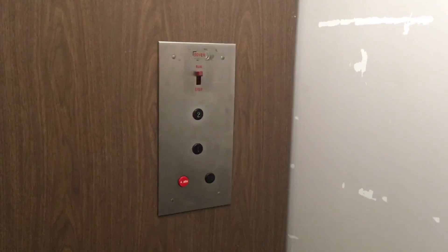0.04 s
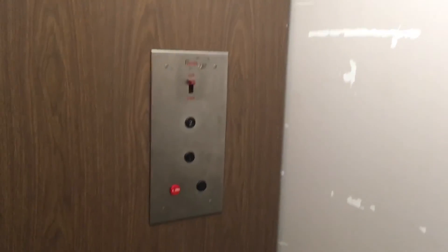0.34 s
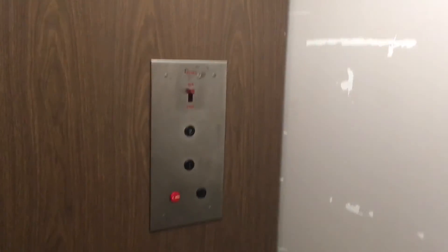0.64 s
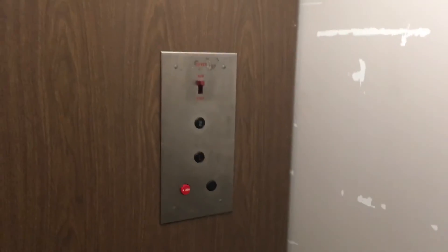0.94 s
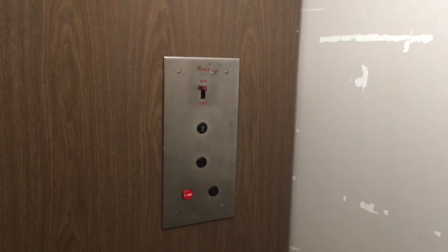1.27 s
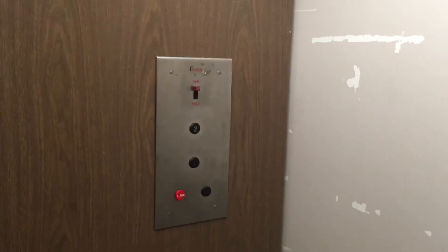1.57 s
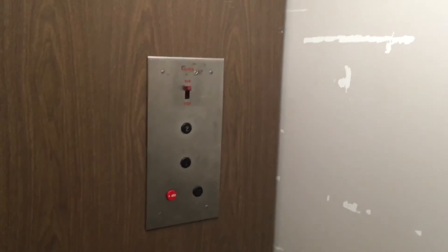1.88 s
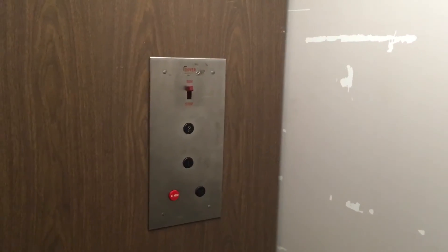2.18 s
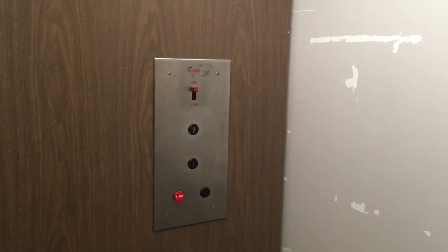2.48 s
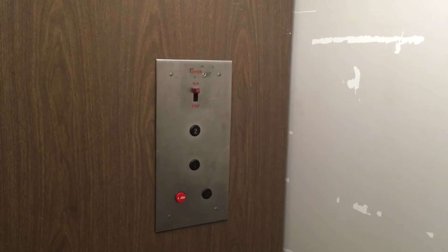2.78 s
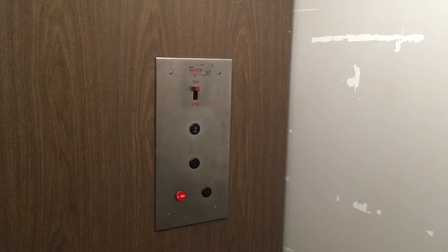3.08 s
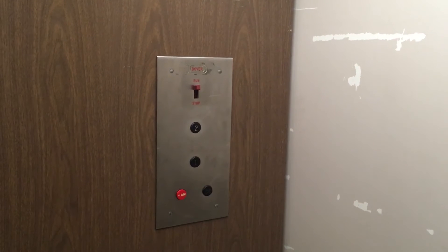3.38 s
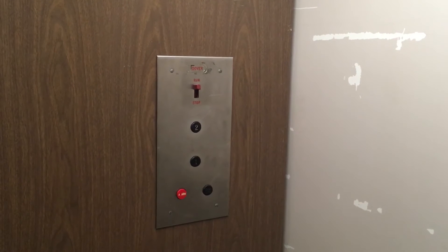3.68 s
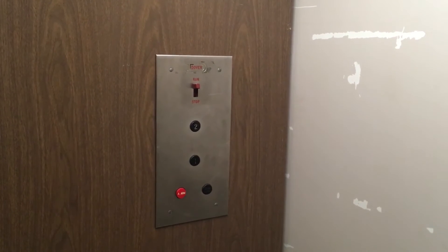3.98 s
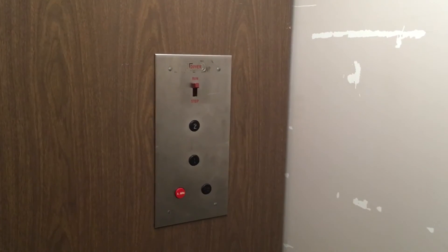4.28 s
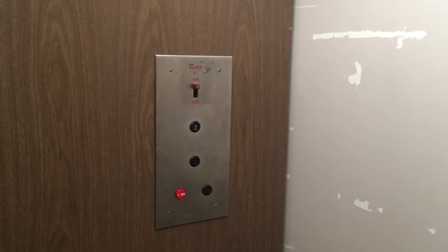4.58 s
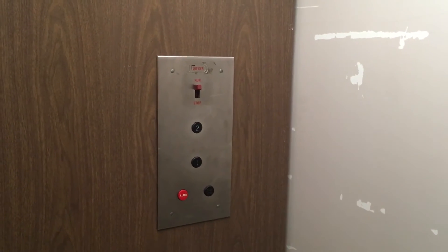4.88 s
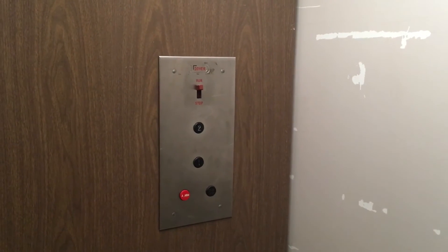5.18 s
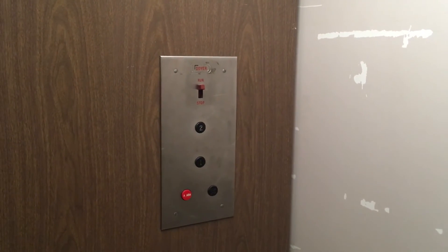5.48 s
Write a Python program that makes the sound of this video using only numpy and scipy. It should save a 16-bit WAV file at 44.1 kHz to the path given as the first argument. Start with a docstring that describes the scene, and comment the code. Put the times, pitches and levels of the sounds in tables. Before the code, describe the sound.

An elevator door rattles and thuds shut, then a soft clunk and a click come over a low machinery hum.

```python
"""Inside an old panelled elevator car. The door rolls along its track, its blows ringing panels and
metalwork; the latch clicks and the door slams shut. The car booms in its low modes and settles with
a knock and a small squeak of metal slipping on metal. Then the linkage clunks softly and a relay
clicks sharply over the machinery's throbbing drone, motor tones, mains hum and the shaft's rumble."""
import sys
import numpy as np
from scipy import signal
from scipy.fft import rfft, irfft
from scipy.io import wavfile
from scipy.ndimage import uniform_filter1d

SR = 44100
rng = np.random.default_rng(int(sys.argv[2]) if len(sys.argv) > 2 else 0)


def persist_wave(psi):
    """Save psi, clipped to +-1, as 16-bit WAV."""
    counts = np.round(np.clip(psi, -1, 1) * 32767).astype(np.int16)
    wavfile.write(sys.argv[1], SR, np.atleast_2d(counts).T)


N = 248724
T = np.arange(N) / SR
HZ = np.fft.rfftfreq(N, 1 / SR)

# Door blows. Each row: start in seconds, panel level in dB, metal level in dB, contact in seconds.
DOOR_BLOWS = [ (0.000, -25, -27.5, 0.003), (0.032, -29, -25.5, 0.0067), (0.085, -56, -34, 0.0074),
              (0.171, -34.5, -39, 0.0034), (0.194, -47, -39, .001), (0.258, -59, -35, 0.018),
              (0.309, -53, -33, 0.0047), (0.335, -35.5, -24.5, 0.0018), (0.355, -25.5, -31.5, 0.0081),
              (0.415, -30.5, -56, 0.017), (0.626, -42, -70.5, .009), (0.676, -51, -53, 0.0032),
              (0.696, -45, -50, 0.0047), (1.170, -57.5, -76, 0.018), (1.313, -68, -71.5, 0.0017), ]
# Knocks on single parts. Each row: start in seconds, part, level in dB, contact in seconds.
PART_KNOCKS = [ (0.000, "track", -24.5, .007), (0.164, "track", -30, 0.011), (0.194, "latch", -23.5, .001),
               (0.335, "latch", -26.5, 0.0014), (0.335, "frame", -25.5, 0.0026),
               (0.340, "floor", -24, 0.015), (0.357, "frame", -23.5, .005), (0.372, "track", -35, 0.01),
               (0.680, "catch", -39, 0.014), (0.919, "catch", -42, 0.0078), (1.900, "lever", -43.5, .003),
               (1.901, "rod", -56.5, 0.0036), (1.912, "rod", -53, .009), (1.915, "floor", -44, .01),
               (1.936, "lever", -42.5, 0.0022), (1.939, "rod", -59, .011), (1.948, "floor", -36, 0.024),
               (4.206, "relay", -48.5, 0.0004), (4.268, "lever", -64, .003), ]
# Resonances by part. Each row: frequency in Hz, width in Hz, peak in dB.
PART_RESONANCES = dict( panel=[(798, 22, 12), (878, 16.7, 12), (1560, 27, 10.5)], metal=[(2280, 130, -1),
                   (4110, 66, 2.5), (5600, 50, 4), (6360, 33, 8.5), (7860, 28, -9), (8580, 53, 9.5)],
                   latch=[(3640, 87, 6), (7130, 80, 3), (9490, 246, 6), (9500, 99, 2), (11520, 60, 5),
                   (13500, 120, 2.5)], frame=[(2537, 22, -1), (2830, 13, 10), (2845, 20, -2), (3030, 90, 7),
                   (3213, 18, 14.5)], track=[(163, 29, 7.5)], catch=[(954, 22, 15), (1185, 210, 9),
                   (2277, 105, 13), (6520, 260, 16)], lever=[(877, 40, 8.5), (1117, 96, 5.5),
                   (1150, 50, 2)], rod=[(4420, 260, 11), (5480, 180, 4)], floor=[(219, 16, 11.5),
                   (394, 20, 11.5)], relay=[(2700, 150, 13), (4530, 400, -3), (7500, 300, -1)])
# Broad spectra by part. Each row: frequency in Hz, relative density in dB.
PART_SPECTRA = dict( panel=[(60, -18), (150, 4.5), (300, -4), (500, -6.5), (720, -11), (880, -12),
                (1150, -5), (1600, -11), (2300, -18.5), (4000, -20.5), (16000, -45.5)], metal=[(300, -32),
                (900, -15), (1600, 0.5), (2300, -4), (3100, -10.5), (3800, -10), (5000, -13.5),
                (6400, -11.5), (8500, -11.5), (11000, -28.5), (16000, -26)], latch=[(1000, -35),
                (3500, -6.5), (4900, -19.5), (6800, -3.5), (8100, -9), (9600, -3), (10500, -8), (11700, -1),
                (15000, -7), (16000, -4)], frame=[(1000, -37), (2300, -20.5), (2800, -6), (3150, -11.5),
                (3400, -12), (3800, -23), (8000, -24.5), (16000, -46)], track=[(70, -10), (118, 2),
                (160, 3), (190, -7.5), (240, -42), (1000, -49)], catch=[(200, -30), (500, 6.5), (700, -8),
                (1150, -3.5), (1600, -19), (2300, -12.5), (4500, -20.5), (6600, -21.5), (9500, -18),
                (16000, -52)], lever=[(200, 1.5), (550, -23), (740, -15.5), (1100, -2), (1400, -8),
                (2100, -21), (5000, -27), (16000, -44)], rod=[(1200, -14), (3000, 0), (3900, -2),
                (4400, -2.5), (5800, 0.5), (7000, -11), (9500, -12), (16000, -37)], floor=[(80, -26),
                (160, -1.5), (220, -1.5), (380, -7.5), (430, -28), (550, -6.5), (750, -21.5), (2000, -36),
                (16000, -75)], relay=[(200, -10), (500, 0), (1700, -1), (2600, -9), (3500, -9), (6400, 0),
                (8500, -1.5), (10500, -13), (16000, -3.5)])
# Decay on top of the cabin's. Each entry: part, rate in dB per second.
PART_DAMPING_DB_PER_S = dict(frame=66, lever=24, catch=10, floor=22)
# Cabin ring time. Each row: frequency in Hz, T60 in seconds.
CABIN_T60_S = [(100, 0.518), (250, 0.84), (500, 0.73), (1000, 0.53), (2200, 0.4), (4000, 0.38), (8000, .3),
               (16000, 0.18)]
# Car shaken by the rolling door. Each row: frequency in Hz, relative density in dB.
RUMBLE_SPECTRUM = [(12, -9), (25, -8.5), (36, 4.5), (47, 10), (63, -11), (84, 10.5), (100, -11.5),
                   (135, -9), (200, -18.5), (400, -72)]
# Rollers on the track. Each row: frequency in Hz, relative density in dB.
ROLLER_SPECTRUM = [(80, -9), (160, 8.5), (200, -0.5), (233, 6.5), (275, -1), (520, 0), (750, -6.5),
                   (1300, -16.5), (1800, -21.5), (2350, -18.5), (3000, -28), (16000, -38)]
# Shaft noise. Each row: frequency in Hz, relative density in dB.
SHAFT_SPECTRUM = [(12, -41.5), (32, 2), (55, 4.5), (90, 1.5), (135, -9.5), (230, -19.5), (400, -21),
                  (800, -31), (1150, -28.5), (1900, -32), (3300, -32), (4900, -39.5), (6000, -36.5),
                  (8000, -42), (13500, -39.5)]
# Motor hum. Each row: frequency in Hz, base level in dB.
MOTOR_TONES = [(231, -69.5), (318, -76)]
# Motor surges. Each row: centre in seconds, length in seconds, hum lift in dB, whine lift in dB.
MOTOR_SURGES = [(3.67, 0.76, 9, 5.5), (4.048, 1, -1.5, 7.5), (5.14, 0.78, 5, 12)]
# Jolts. Each row: start in seconds, car level in dB, door leaf level in dB, rise in seconds.
CAR_JOLTS = [(0.003, -25, -38.5, 0.0084), (0.345, -15, -17.5, 0.018), (1.951, -28, -65, 0.0082)]
# Car body modes. Each row: frequency in Hz, relative level in dB, T60 in seconds.
CAR_MODES = [(46.4, -8.5, 2.08), (70, -5, 0.38), (83.3, -1, 1.1), (91.3, 1, 0.76), (129.7, -20.5, .5)]
# Door leaf modes. Each row: frequency in Hz, relative level in dB, T60 in seconds.
LEAF_MODES = [(120.3, 4, 0.72), (146.5, -6, 0.73), (182.2, 3, 0.49), (233.7, 1.5, 1.615),
              (240.4, -3.5, 1.1), (316, -11, 1.4), (439.3, -14.5, 1.8), (496, -18.5, 1.85),
              (550.5, -13.5, 1.24)]
# Metal slips. Each row: start in seconds, length in seconds, first and last pitch in Hz, level in dB.
SQUEAK_SLIPS = [(0.816, 0.038, 3640, 3350, -50), (0.833, 0.0333, 3200, 2980, -51)]
# Swells added to the drone. Each row: centre in seconds, length in seconds, level in dB.
DRONE_THROBS = [ (3.002, 0.24, -48), (3.25, 0.22, -47), (3.695, .2, -38.5), (4.427, 0.34, -44),
                (4.74, 0.21, -38.5), (4.945, 0.2, -39), (5.126, 0.18, -34), (5.418, 0.34, -39),
                (5.61, 0.33, -43), ]


def amp(db):
    """Decibels to gain."""
    return 10 ** (np.asarray(db) / 20)


def unit_rms(x):
    """Scales to rms 1."""
    return x / np.sqrt(np.mean(x ** 2) + 1e-20)


def lookup(points, hz):
    """Interpolates a table over log frequency."""
    points_hz, values = np.transpose(points)
    return np.interp(np.log(hz + 1), np.log(points_hz + 1), values)


def add(mix, start_s, sound):
    """Mixes a sound in at start_s."""
    span = mix[max(round(start_s * SR), 0):][:len(sound)]
    span += sound[:len(span)]


def noise(spectrum_db):
    """Shaped noise, rms 1."""
    return unit_rms(irfft(rfft(rng.standard_normal(N)) * amp(spectrum_db), N))


def steady_noise(spectrum):
    """Shaped noise, slow swells levelled out."""
    raw = noise(lookup(spectrum, HZ))
    return raw / np.sqrt(uniform_filter1d(raw ** 2, 4000) + 1e-9)


def wander(rate_hz):
    """Random motion below rate_hz, rms 1."""
    return noise(-20 * np.log10(1 + (HZ / rate_hz) ** 4))


def tone(hz, drift_hz):
    """Sine with drifting pitch, rms 1."""
    pitch_hz = hz + drift_hz * wander(rate_hz=11.9)
    return np.sqrt(2) * np.sin(2 * np.pi * np.cumsum(pitch_hz) / SR)


def swell(centre_s, length_s):
    """Smooth rise from 0 to 1 and back."""
    return np.cos(np.pi * np.clip((T - centre_s) / length_s, -.5, .5)) ** 2


def part_ring(part, ripple_db=3.5, size=65536):
    """A part rings in the cabin: dense modes, the high ones dying first."""
    hz = np.fft.rfftfreq(size, 1 / SR)
    peaks_db = sum(db / (1 + (2 * (hz - peak_hz) / width_hz) ** 2)
                   for peak_hz, width_hz, db in PART_RESONANCES[part])
    # The strike point favours some modes.
    ripple = unit_rms(uniform_filter1d(rng.standard_normal(len(hz)), size=130))
    gain = amp(lookup(PART_SPECTRA[part], hz) + peaks_db + ripple_db * ripple)
    phases = np.exp(2j * np.pi * rng.random(len(hz)))
    modes = unit_rms(irfft(gain * phases))
    band_hz, frame_s, bands = signal.stft(modes, SR, nperseg=512)
    decay = amp(-60 * frame_s / lookup(CABIN_T60_S, band_hz)[:, None])
    return signal.istft(bands * decay, SR, nperseg=512)[1][:size]


def strike(part, contact_s, echo_gain=0.36, echo_s=0.02, snap_gain=2.2, snap_s=0.00076):
    """The ring builds during contact; first arrival and nearest echoes stand out."""
    ring = part_ring(part)
    t = np.arange(len(ring)) / SR
    early = 1 + echo_gain * np.exp(-t / echo_s) + snap_gain * np.exp(-t / snap_s)
    attack = 1 - np.exp(-t / contact_s)
    damping = amp(-PART_DAMPING_DB_PER_S.get(part, 0) * t)
    return ring * early * attack * damping


def door_rattle(latch_offset_db=-7, frame_offset_db=-12.5, chatter_db=1.0):
    """Each blow knocks the panels and rings metalwork, latch and frame."""
    out = np.zeros(N)
    for start_s, panel_db, metal_db, contact_s in DOOR_BLOWS:
        levels_db = dict(panel=panel_db, metal=metal_db,
                         latch=metal_db + latch_offset_db, frame=metal_db + frame_offset_db)
        for part, db in levels_db.items():
            add(out, start_s, amp(db) * strike(part, contact_s))
    return out * amp(chatter_db * wander(rate_hz=470))  # loose parts bounce against each other


def fitting_knocks():
    """The door shudders, latches and thumps the floor; catch drops, linkage clunks, relay clicks."""
    out = np.zeros(N)
    for start_s, part, db, contact_s in PART_KNOCKS:
        add(out, start_s, amp(db) * strike(part, contact_s))
    return out


def door_rolling(slows_s=0.44, rests_s=1.7, settle_s=0.88, bump_db=2, dull_hz=700, dull_s=1.0):
    """Rollers bump along the track and shake the car, fading and dulling as they slow."""
    slowing_s = np.maximum(T - slows_s, 0)
    rumble_db = -24 - 18.5 * slowing_s
    rumble = steady_noise(RUMBLE_SPECTRUM) * amp(rumble_db)
    rollers_db = -33 - 27 * slowing_s
    rollers = steady_noise(ROLLER_SPECTRUM) * amp(rollers_db + bump_db * wander(rate_hz=9))
    lows = irfft(rfft(rollers) / (1 + (HZ / dull_hz) ** 4), N)
    highs = (rollers - lows) / (1 + (T / dull_s) ** 4)
    fade_out = np.clip(1 - (T - rests_s) / settle_s, 0, 1)
    return fade_out * (rumble + lows + highs)


def shaft_air(level_db=-50.5):
    """Soft shaft rumble and thin hiss."""
    return amp(level_db) * noise(lookup(SHAFT_SPECTRUM, HZ))


def mains_hum(hz=118.9, level_db=-54):
    """Steady electrical hum."""
    return amp(level_db) * tone(hz, drift_hz=0.199)


def motor(waver_depth=0.58, whine_hz=1060, whine_db=-84.5):
    """Wavering tones and a faint whine; levels follow the motor's surges."""
    hum_lift_db = sum(db * swell(centre_s, length_s) for centre_s, length_s, db, _ in MOTOR_SURGES)
    whine_lift_db = sum(db * swell(centre_s, length_s) for centre_s, length_s, _, db in MOTOR_SURGES)
    hum = np.zeros(N)
    for hz, db in MOTOR_TONES:
        partial = amp(db + hum_lift_db) * tone(hz, drift_hz=3.5)
        hum += partial * (1 + waver_depth * wander(rate_hz=4.2))
    whine = amp(whine_db + whine_lift_db) * tone(whine_hz, drift_hz=6)
    return hum + whine


def boom(modes):
    """Low modes pushed together, each with its own decay; starts at rms 1."""
    start_rms = np.linalg.norm([amp(db) for _, db, _ in modes]) / np.sqrt(2)
    ring = sum(amp(db - 60 * T / t60_s) * np.sin(2 * np.pi * hz * T) for hz, db, t60_s in modes)
    return ring / start_rms


def car_jolts():
    """Heavy blows boom the car and leave the door leaf humming."""
    out = np.zeros(N)
    car, leaf = boom(CAR_MODES), boom(LEAF_MODES)
    for start_s, car_db, leaf_db, rise_s in CAR_JOLTS:
        attack = 1 - np.exp(-T / rise_s)
        add(out, start_s, (amp(car_db) * car + amp(leaf_db) * leaf) * attack)
    return out


def squeak(second_db=-1, third_db=-16, jitter=.045, direct_gain=0.59, echo_t60_s=.3, echo_size=16384):
    """Metal slips twice on metal: rough falling whistles, smeared by the cabin walls."""
    out = np.zeros(N)
    for start_s, length_s, first_hz, last_hz, db in SQUEAK_SLIPS:
        count = round(length_s * SR)
        roughness = 1 + jitter * wander(rate_hz=350)[:count]
        pitch_hz = np.linspace(first_hz, last_hz, count) * roughness
        phase = 2 * np.pi * np.cumsum(pitch_hz) / SR
        whistle = np.sin(phase) + amp(second_db) * np.sin(2 * phase) + amp(third_db) * np.sin(3 * phase)
        whistle *= signal.windows.tukey(count, .25)
        walls = rng.standard_normal(echo_size) * amp(-60 * T[:echo_size] / echo_t60_s)
        walls /= np.linalg.norm(walls)
        walls[0] += direct_gain
        add(out, start_s, amp(db) * signal.fftconvolve(whistle, walls))
    return out


def machinery_drone(hz=83.2, base_db=-52, start_s=2.28, rise_s=.12):
    """A low machine tone sets in and throbs."""
    fade_in = np.clip((T - start_s) / rise_s, 0, 1)
    throbs = sum(amp(db) * swell(centre_s, length_s) for centre_s, length_s, db in DRONE_THROBS)
    return (fade_in * amp(base_db) + throbs) * tone(hz, drift_hz=1.73)


def scene():
    """All sources in the car, mono."""
    door = door_rattle() + fitting_knocks() + door_rolling()
    background = shaft_air() + mains_hum() + motor()
    return (door + background + car_jolts() + squeak() + machinery_drone())[None]


def record(dry):
    """Low-pass at 15.8 kHz."""
    lowpass = signal.firwin(511, 15800, window=("kaiser", 9), fs=SR)
    return signal.oaconvolve(dry, lowpass[None], "same")


dry = scene()
out = record(dry)
persist_wave(out)
```